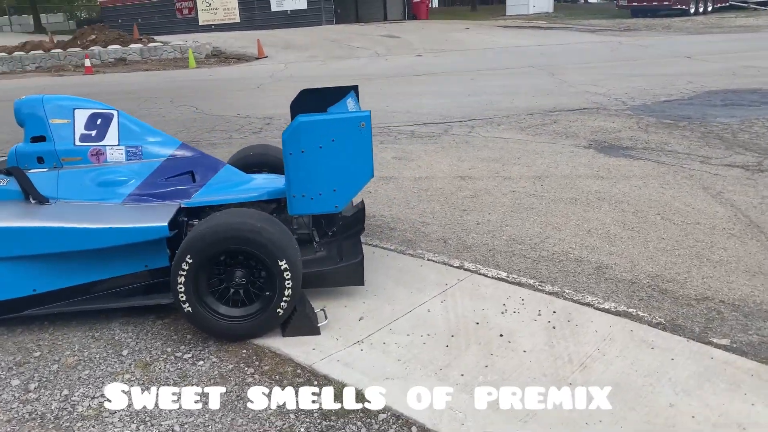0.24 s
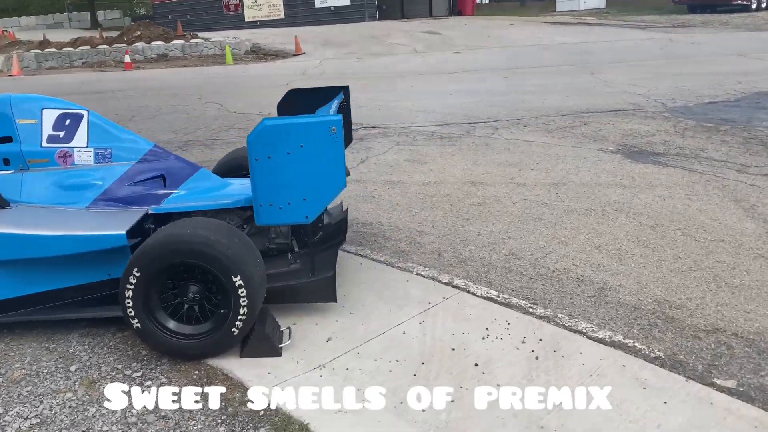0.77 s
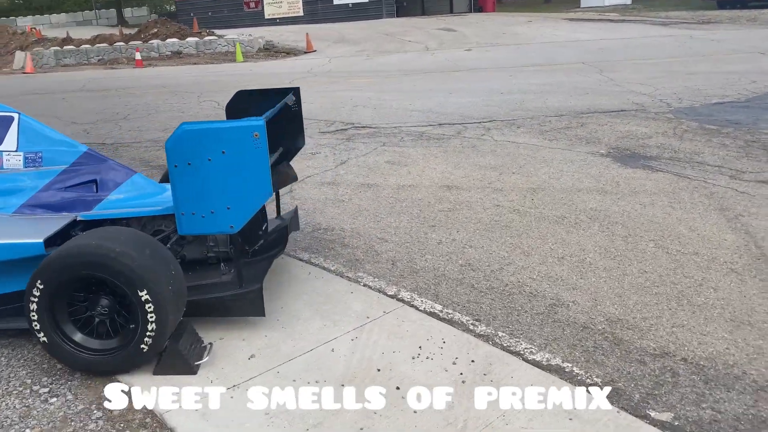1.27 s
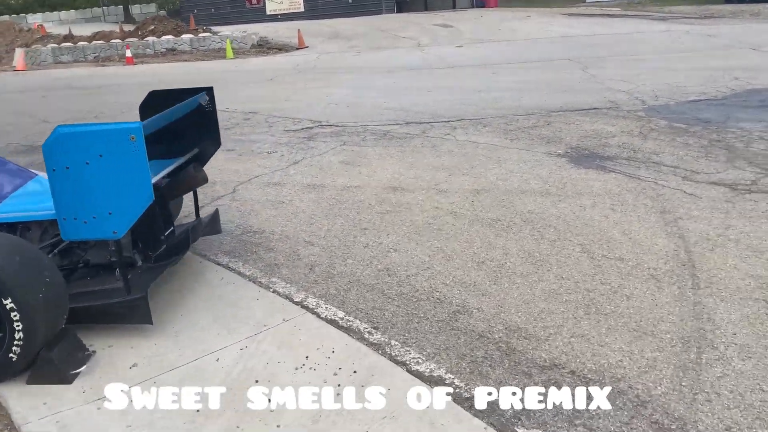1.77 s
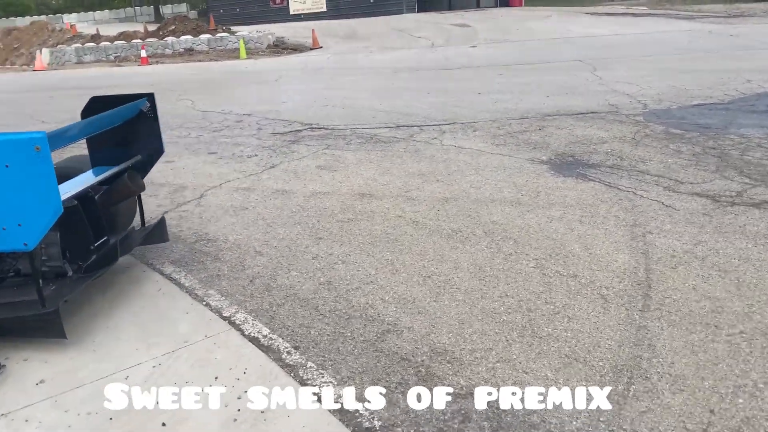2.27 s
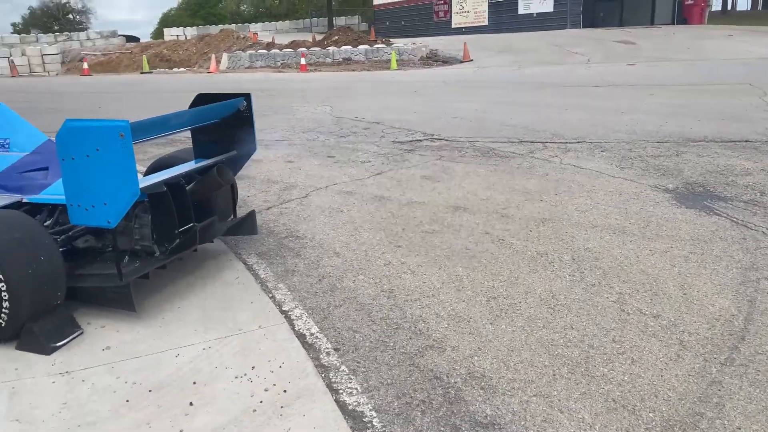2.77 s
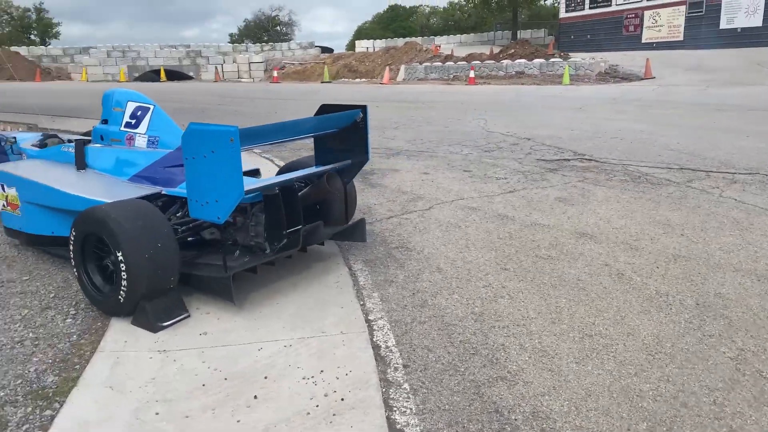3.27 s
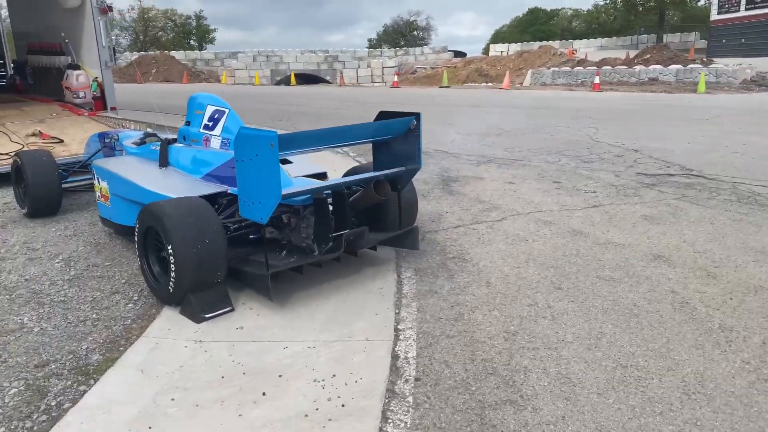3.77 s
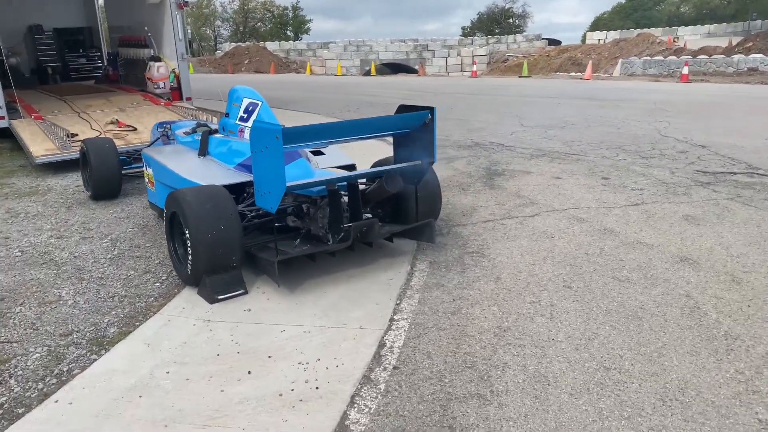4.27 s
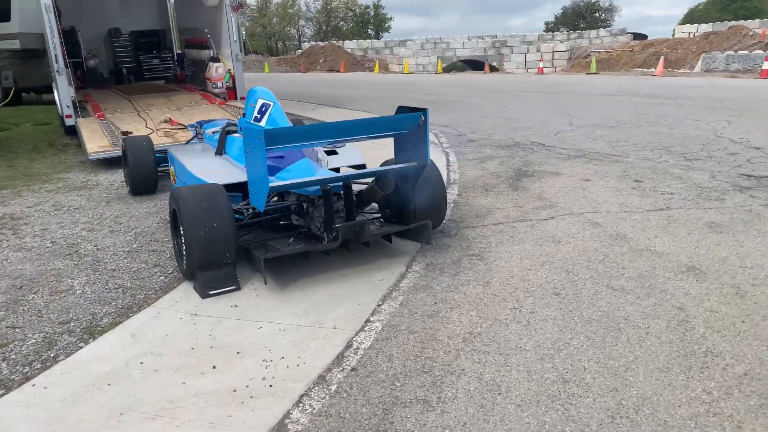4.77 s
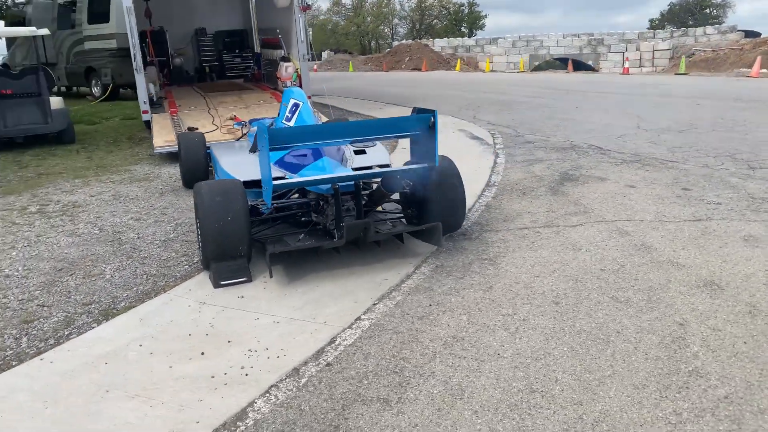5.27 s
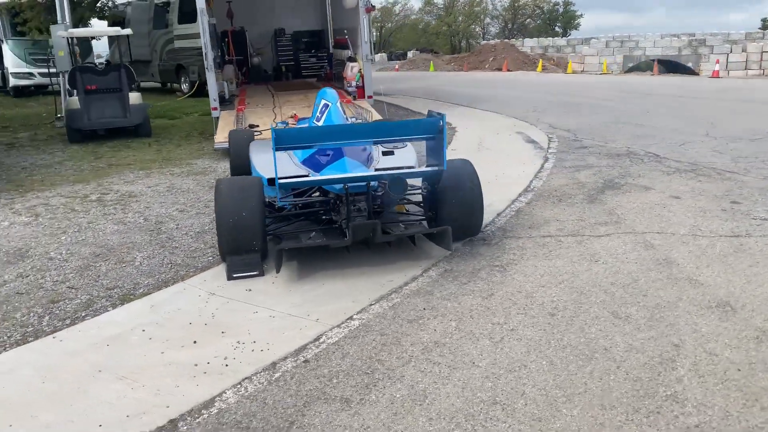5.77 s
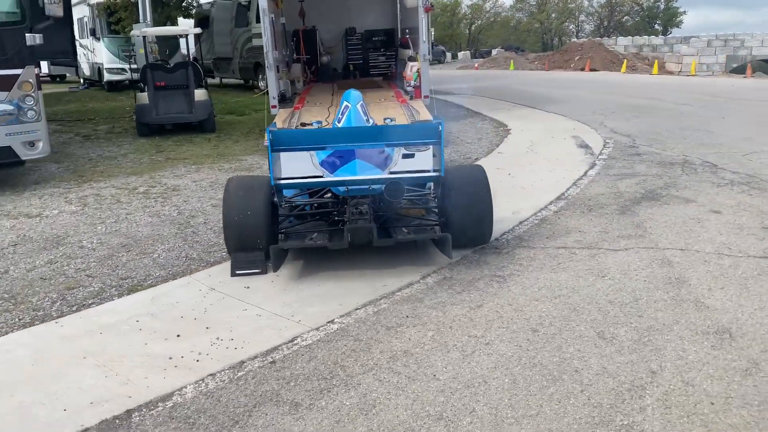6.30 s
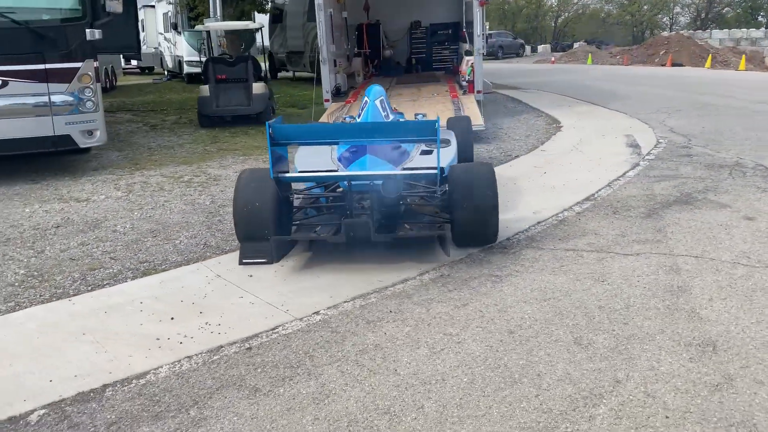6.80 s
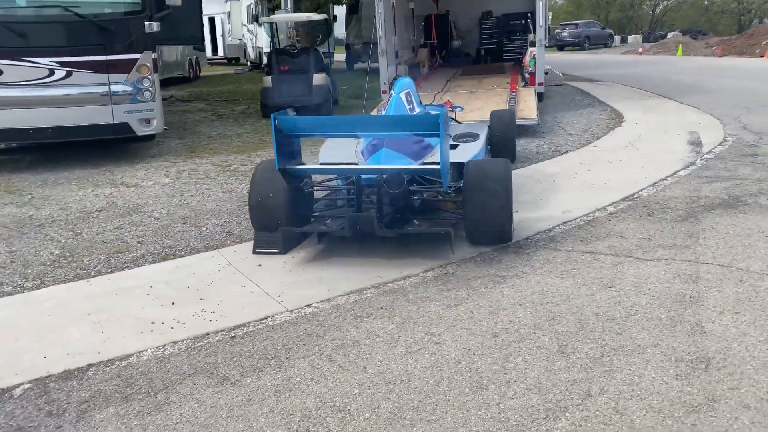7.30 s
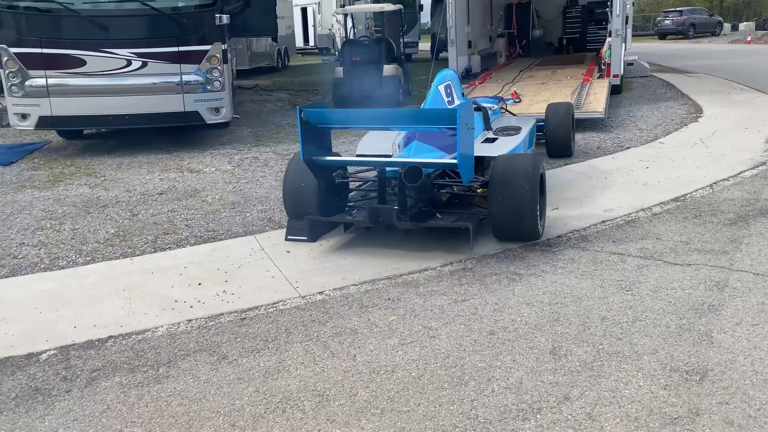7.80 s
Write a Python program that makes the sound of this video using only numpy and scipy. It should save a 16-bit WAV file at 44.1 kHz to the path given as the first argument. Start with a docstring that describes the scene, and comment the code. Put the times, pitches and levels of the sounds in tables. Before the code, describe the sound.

A rotary racing engine idles outdoors with a rapid, lumpy braap, raspy exhaust bursts and stray pops between them.

```python
"""An open paved pad: a rotary racing engine idles while a microphone is carried from its flank to its rear.
The engine fires in short runs that speed it up, then misfires and coasts down, with lone pops between:
a lumpy braap. Each firing rings the modes of the exhaust pipe, rasps as turbulent gas and cracks as
shock fronts at the outlet; unfired chambers only puff and hiss. The machinery whirrs underneath,
pavement, bodywork and yard reflect the sound, and a little wind buffets the microphone."""
import sys
import numpy as np
from scipy import signal
from scipy.io import wavfile

SR = 44100
rng = np.random.default_rng(int(sys.argv[2]) if len(sys.argv) > 2 else 0)


def dump(signal):
    """Clip the signal to [-1, 1] and save it as 16-bit WAV at the path in sys.argv[1]."""
    limited = np.clip(np.atleast_2d(signal).T, -1, 1)
    pcm = np.round(limited * 32767).astype(np.int16)
    wavfile.write(sys.argv[1], SR, pcm)


N = 355005
TIME = np.arange(N) / SR

# spectrum of the shock fronts at the outlet, also of the hiss: (frequency [Hz], relative density [dB])
CRACK = [(500, -15), (1200, -23.5), (1650, -6), (2100, 10), (2450, 5.5), (2950, 6), (3500, 0.5),
         (4900, 3.5), (5900, -1.5), (7200, 2.5), (10500, 2), (12500, -9.5), (14200, 1.5), (15800, -18)]
# the walk round the car: (time [s], car to the left [0-1], outlet hidden by the flank [0-1],
# coasting puffs [dB], their hiss [dB])
WALK = [(0, .3, 1, -11, -29), (1, 0.28, 1, -17, -40), (1.6, 1, 0.9, -21, -39), (2.6, .99, 0.77, -19.5, -52),
        (3.198, 0.12, 0.4, -16.5, -79), (4.198, 0.1, 0.19, -19.5, -59), (5.2, 0.08, 0.07, -16, -45),
        (6.2, 0.04, 0.23, -17, -36), (7.2, 0.24, 0.07, -15.5, -50), (8.05, 0.03, 0.19, -17.5, -28)]


def firing(s, crack_db, blast_db, spikiness=0.6, jet_at_s=3.27, jet_width_s=0.76):
    """Impulsive excitation: each blast rings the pipe, stirs its gas and leaves as shock fronts."""
    # turbulent gas in the pipe: (frequency [Hz], relative density [dB])
    rasp_spectrum = [(60, -13.5), (220, 8), (340, 4), (460, -1.5), (590, 1.5), (660, -12), (760, 0),
                     (950, -3), (1120, -8.5), (1300, -10), (1600, -12.5), (2100, -12.5), (3000, -15),
                     (8000, -44)]
    # gas tearing at the outlet after a blast: (frequency [Hz], relative density [dB])
    tearing_spectrum = [(300, -21), (600, 3), (1000, -4), (1600, -1), (2500, 4), (3500, -5), (6000, -15),
                        (12000, -28)]
    in_jet = np.exp(-((s - jet_at_s) / jet_width_s) ** 2)  # the microphone crosses the line of the jet
    boom = pipe(silencer(clicks(s, gain_of(.5 * blast_db + 6 - 2 * in_jet))))
    gas_db = blast_db + 1.5 * in_jet
    slam = swell(s, gas_db, rise=0.00072, fall=0.0018)
    churning = swell(s, gas_db - 5.5, rise=0.014, fall=0.0086)
    rasp = tint(rng.standard_normal(N) * (slam + churning), rasp_spectrum)
    shocks = unit_rms(rng.standard_normal(N) * np.exp(spikiness * rng.standard_normal(N)))
    snap = swell(s, crack_db + 3, rise=0.00086, fall=0.0023)
    tail = swell(s, crack_db - 13.5, rise=0.0096, fall=0.0054)
    tearing = swell(s, blast_db - 20 + 14.5 * in_jet, rise=.004, fall=0.0051)
    return boom + rasp + tint(shocks * (snap + tail), CRACK) + tint(shocks * tearing, tearing_spectrum)


def braap(start, length, count, crack_db, change_db, blast_db, gap_ratio=.92, build_db=.93, uneven_db=1.13):
    """Accelerating pulse train as the rotors speed up: rows of (time [s], crack [dB], blast [dB])."""
    k = np.arange(round(count))
    progress = np.r_[0, np.cumsum(gap_ratio ** k[:-1])]
    progress = progress / progress[-1]
    crack_scatter, blast_scatter = uneven_db * rng.standard_normal((len(k), 2)).T  # no two burn alike
    run = np.column_stack([start + length * progress,
                           crack_db + change_db * progress + crack_scatter,
                           blast_db + build_db * (k - k.mean()) + blast_scatter])
    run[0, 1] -= 0.5  # the first firing burns lean and cracks less
    afterfire = run[-1] + [.0098, -22, -7.5]  # a long run ends in a dull pop
    return np.vstack([run, afterfire]) if len(k) >= 5 else run


def pipe(push, size=12000):
    """Modal resonance: pressure pulses ring the exhaust as a sum of damped cosines."""
    # modes of the pipe and silencer: (frequency [Hz], level [dB], decay time T60 [s])
    modes = [(72.6, -17, 0.15), (89.5, -11.5, 0.028), (144.5, -25.5, 0.19), (186.3, -20.5, 0.056),
             (221, -22, 0.073), (223.3, -27, 0.067), (298, -63, 0.049), (310, -32.5, 0.12),
             (456, -33, 0.082), (527, -83, 0.11), (699, -20.5, 0.035), (800, -30, 0.11),
             (1176, -38.5, 0.09), (1530, -16.5, 0.0052), (2430, -12, 0.0055)]
    t = np.arange(size) / SR
    response = sum(gain_of(db - 60 * t / t60) * np.cos(2 * np.pi * hz * t) for hz, db, t60 in modes)
    return convolve(push, response)


def silencer(push, dull_hz=420):
    """Reflection in a duct: a strong wave returns twice, dulled, so the thump swells after the crack."""
    dulled = signal.sosfilt(signal.butter(2, dull_hz, fs=SR, output="sos"), push)
    return push + 0.44 * delay(dulled, lag_s=0.00416) + 0.49 * delay(dulled, lag_s=.029)


def misfires(fired, fastest_s=0.012, slowest_s=.0232, slowing=.045):
    """Slowing pulse train: times and spacings of unfired port openings as the rotors lose speed."""
    times, spacings = [], []
    for before, start, end in zip(np.r_[0, fired], fired, fired[1:]):
        step, steps = np.clip(start - before, fastest_s, slowest_s - .002), []
        while sum(steps) + step / 2 < end - start:
            steps.append(step)
            step = min(step * (1 + slowing), slowest_s)
        if len(steps) > 1:
            steps = np.array(steps) * (end - start) / sum(steps)  # fill the gap to the next firing
            times.extend(start + np.cumsum(steps)[:-1])
            spacings.extend(steps[:-1])
    return np.array(times), np.array(spacings)


def coasting(s, spacing, uneven_db=2, speed_db=14):
    """Pulsating flow: unfired chambers puff into the pipe, and hiss more while the rotors are fast."""
    # soft push of an unfired chamber: (frequency [Hz], level [dB])
    puff_spectrum = [(30, -26), (65, 9), (110, -2), (170, 5.5), (225, 13), (310, 4), (500, -0.5),
                     (900, -15.5), (2000, -21), (6000, -71)]
    push, spit, stumble = rng.standard_normal((len(s), 3)).T
    s = s + .0005 * stumble
    pulses = clicks(s, gain_of(walk(s, column=3) + uneven_db * push))
    puffs = pipe(convolve(pulses, minimum_phase(puff_spectrum)))
    hiss_db = walk(s, column=4) + 3 * spit + speed_db * np.log(0.013 / spacing)
    return puffs + tint(rng.standard_normal(N) * swell(s, hiss_db, rise=0.0013, fall=0.0045), CRACK)


def whirr(openings, level_db=-32, hiss_db=-55, shade_db=6):
    """Amplitude-modulated noise: machinery chatters at each port opening and at random between them."""
    # rotors, intake and pumps: (frequency [Hz], relative density [dB])
    whirr_spectrum = [(20, 13), (60, -11), (120, 7), (225, 1.5), (330, 2), (500, -5.5), (800, -5.5),
                      (1250, -18), (1700, -15), (3000, -20.5), (5000, -25.5), (8000, -31), (11000, -35),
                      (16000, -64)]
    knocks = np.r_[openings, rng.uniform(0, N / SR, len(openings))]
    chatter = .5 + swell(knocks, 3 * rng.standard_normal(len(knocks)) - 3, rise=.0006, fall=.003)
    hiss_gain = gain_of(hiss_db - shade_db * walk(TIME, column=2))  # the flank shades the hiss
    hiss = hiss_gain * tint(rng.standard_normal(N) * chatter, CRACK)
    return gain_of(level_db) * tint(rng.standard_normal(N) * chatter, whirr_spectrum) + hiss


def reflections(x, dull_hz=4500, thin_hz=130):
    """Comb filtering: close copies off pavement and bodywork interfere with the direct sound."""
    # paths along the walk: (time [s], ground gain [ratio], bodywork lag [ms], bodywork gain [ratio]);
    # the last is negative where the sound bends round the rear wing
    paths = [(0.8, 0.34, 2.93, .33), (1.3, 0.44, 2.56, -0.29), (2.1, .6, 2.52, -0.34),
             (3.3, 0.57, 2.66, -0.37), (3.9, .45, 2.7, -0.071), (4.5, .36, 2.5, 0.08)]
    times, *columns = np.transpose(paths)
    ground, body_ms, body = (np.interp(TIME, times, column) for column in columns)
    dulled = signal.sosfilt(signal.butter(1, dull_hz, fs=SR, output="sos"), x)
    thinned = signal.sosfilt(signal.butter(1, thin_hz, "highpass", fs=SR, output="sos"), x)
    combed = x + ground * delay(dulled, lag_s=.001152) + body * delay(thinned, body_ms / 1000)
    return combed / np.sqrt(1 + ground ** 2)


def microphone(x):
    """Stereo by phase and level differences that follow the car's bearing; the flank colours both sides."""
    # left channel against right: (frequency [Hz], phase lead with the car ahead [rad],
    # lead with it to the left [rad], balance with it ahead [dB], balance with it to the left [dB])
    ports = [(60, 0, 0, -1, -1.5), (200, .03, .25, -.5, -.5), (700, .15, 1, 1.5, 5), (1700, .2, 2.1, .3, 6),
             (3000, 1.1, 2.6, .5, 5), (4400, .9, 0, 3, 6.5), (6200, .6, .2, 2.5, 4),
             (7400, -1.1, -1.2, 2, 2), (8500, -3.1, -3.1, 1, 1), (10200, -6.3, -6.3, 0, 0),
             (12200, -9.4, -9.4, 0, 0), (14000, -12.5, -12.5, 0, 0), (16000, -15.7, -15.7, 0, 0)]
    # colour of the exhaust heard from the flank: (frequency [Hz], gain [dB])
    flank = [(60, 1.5), (150, 8), (230, 1.5), (320, 4), (600, 5.5), (850, 2), (1150, 3.5), (1450, 3.5),
             (2400, -8), (3300, -13), (4500, -9.5), (9000, -11.5), (15000, -13)]
    hz, t, z = signal.stft(x, SR, nperseg=512, noverlap=384)
    aside, hidden = walk(t, column=1), walk(t, column=2)
    lead = np.outer(lookup(ports, hz, 1), 1 - aside) + np.outer(lookup(ports, hz, 2), aside)
    balance_db = np.outer(lookup(ports, hz, 3), 1 - aside) + np.outer(lookup(ports, hz, 4), aside)
    half = gain_of(balance_db / 2) * np.exp(.5j * lead)
    z = z * gain_of(np.outer(lookup(flank, hz), hidden))
    return signal.istft(np.array([z * half, z / half]), SR, nperseg=512, noverlap=384)[1][:, :N]


def yard(x, size=16000):
    """Reverberation: sparse echoes scatter from trailers and walls, different in each ear."""
    # decay of the echoes: (frequency [Hz], reverberation time T60 [s])
    decay = [(100, 0.89), (800, 0.4), (3000, 0.12), (12000, 0.12)]
    taps = rng.standard_normal((2, size)) * (rng.random((2, size)) < .05) * (TIME[:size] > .008)
    hz, t, z = signal.stft(taps, SR, nperseg=256)
    tail = signal.istft(z * gain_of(-60 * t / lookup(decay, hz)[:, None]), SR, nperseg=256)[1]
    return np.array([convolve(x, side / np.linalg.norm(side)) for side in tail])


def wind(corner_hz=70, calm_db=-54):
    """Turbulent pressure at the microphone: a low rumble, mostly common to both channels."""
    # buffets of air: (time [s], level [dB], half-width [s])
    gusts = [(6.536, -7, 0.022), (7.022, -8, 0.025), (7.308, -7, 0.03)]
    buffets = sum(gain_of(db) * np.exp(-((TIME - s) / width) ** 2) for s, db, width in gusts)
    lumps = signal.sosfilt(signal.butter(2, corner_hz, fs=SR, output="sos"), rng.standard_normal((3, N)))
    return (gain_of(calm_db) + buffets) * unit_rms(lumps[:2] + 2.7 * lumps[2])


def gain_of(db):
    """Decibels to amplitude ratio."""
    return 10 ** (np.asarray(db) / 20)


def unit_rms(x):
    """Normalisation to unit power."""
    return x / np.sqrt(np.mean(x ** 2) + 1e-20)


def lookup(spectrum, hz, column=1):
    """Interpolation of one column of a spectrum on a log-frequency axis."""
    table = np.transpose(spectrum)
    return np.interp(np.log(hz + 1), np.log(table[0] + 1), table[column])


def walk(s, column):
    """Linear interpolation of one column of the walk at the times s."""
    table = np.transpose(WALK)
    return np.interp(s, table[0], table[column])


def convolve(x, response):
    """Convolution, cut to the length of the scene."""
    return signal.oaconvolve(x, response)[:N]


def minimum_phase(spectrum, size=4096):
    """Causal impulse response whose phase follows from its spectrum by the Hilbert transform."""
    log_gain = np.log(gain_of(lookup(spectrum, abs(np.fft.fftfreq(size, 1 / SR)))))
    return np.fft.ifft(np.exp(signal.hilbert(log_gain).conj())).real[:size // 2]


def tint(x, spectrum):
    """Spectral shaping that keeps the power of white noise."""
    response = minimum_phase(spectrum)
    return convolve(x, response / np.linalg.norm(response))


def clicks(s, sizes):
    """Impulse train: one click of each size at the times s."""
    return np.bincount(np.clip(np.round(s * SR).astype(int), 0, N - 1), sizes, N)


def swell(s, db, rise, fall, size=3000):
    """Incoherent sum: envelope of bursts that each peak at db; rise and fall are time constants [s]."""
    t = np.arange(size) / SR
    power = ((1 - np.exp(-t / rise)) * np.exp(-t / fall)) ** 2
    return np.sqrt(abs(convolve(clicks(s, gain_of(db) ** 2), power / power.max())))


def delay(x, lag_s):
    """Propagation delay, steady or moving."""
    return np.interp(TIME - lag_s, TIME, x)


def scene():
    """Superposition of the engine, its reflections, echoes from ahead and all round, and the wind."""
    # runs of firings, one braap each: (start [s], length [s], firings [count], crack at the outlet [dB],
    # change of the crack by the end [dB], blast [dB])
    runs = [(0.0444, .0545, 4, -21, 3.5, -15.5), (0.3386, .0925, 6, -17, 0.5, -14.5),
            (0.5581, .0184, 2, -13.5, 1, -12), (0.6808, 0.054, 4, -18, 3.5, -15),
            (0.911, .0855, 6, -14, 2.5, -12.5), (1.212, .035, 3, -9.5, -1, -11),
            (1.28, .0094, 2, -14, -22, -10.5), (1.4056, .0185, 2, -26.5, 11.5, -21),
            (1.4904, .0365, 3, -11, -1, -13), (1.56, .015, 2, -13, 1, -13),
            (1.7364, .107, 7, -13.5, -1.5, -13.5), (2.0597, .0848, 6, -10.5, -4.5, -15.5),
            (2.3601, .084, 6, -10.5, -4, -14.5), (2.6704, .0895, 6, -12, -1.5, -13.5),
            (2.9825, .0825, 6, -15, -4, -13), (3.323, .0845, 6, -16.5, -7, -12),
            (3.640, 0.073, 5, -13.5, -1.5, -11), (3.942, .0703, 5, -10.5, -4, -15),
            (4.1877, .0533, 4, -13.5, -1, -14), (4.4167, .0538, 4, -14.5, -4.5, -14.5),
            (4.6801, .0523, 4, -15, -4, -12), (4.9181, .0517, 4, -15, -3.5, -11.5),
            (5.1752, .0855, 6, -18, -1.5, -11.5), (5.5083, .0806, 6, -18.5, -0.5, -13),
            (5.821, 0.076, 5, -15.5, 3.5, -12.5), (6.122, .0865, 6, -12.5, -5, -13),
            (6.4694, .0685, 5, -15, -3.5, -14.5), (6.7446, .09, 6, -16.5, -7, -14),
            (7.0433, .0575, 4, -14.5, -2.5, -14), (7.3419, .0483, 4, -17, -1.5, -11),
            (7.64, .0857, 6, -14, -3, -14.5), (7.9726, .0635, 4, -24.5, 10, -21)]
    # lone pops between misfires: (time [s], crack at the outlet [dB], blast [dB])
    pops = [(0.001, -19, -20), (0.1286, -16.5, -11.5), (0.2547, -15, -10.5), (0.6374, -14.5, -13),
            (0.7734, -12, -9), (1.1495, -11, -7.5), (1.9959, -10.5, -7), (2.9141, -36, -25.5),
            (3.8826, -16, -6.5), (4.1464, -16.5, -11.5), (4.3743, -18.5, -11.5), (4.5023, -13.5, -14),
            (4.6362, -16.5, -12.5), (4.8778, -13, -12), (5.485, -33, -32), (6.318, -15, -13),
            (6.449, -34, -26), (6.6972, -42, -41), (6.997, -15, -17), (7.1317, -17.5, -15),
            (7.2614, -15, -15), (7.3015, -15, -13.5), (7.8346, -14, -14), (7.8705, -16, -12)]
    firings = np.vstack([braap(*row) for row in runs] + [pops])
    fired, crack_db, blast_db = firings[np.argsort(firings[:, 0])].T
    unfired, spacing = misfires(fired)
    engine = firing(fired, crack_db, blast_db) + coasting(unfired, spacing) + whirr(np.r_[fired, unfired])
    ahead = reflections(engine) + gain_of(-24) * yard(engine)[0]
    return microphone(ahead) + gain_of(-22.5) * yard(engine) + wind()


def record(dry, bass_hz=47, ceiling=.88, edge_hz=15900):
    """Bass roll-off, soft saturation of the hardest blasts, then the band limit."""
    thinned = signal.sosfilt(signal.butter(5, bass_hz, "highpass", fs=SR, output="sos"), dry)
    squeezed = thinned / (1 + (thinned / ceiling) ** 4) ** (1 / 4)
    band_limit = signal.firwin(201, edge_hz, window=("kaiser", 9), fs=SR)
    return signal.oaconvolve(squeezed, band_limit[None], "same")


dry = scene()
out = record(dry)
dump(out)
```